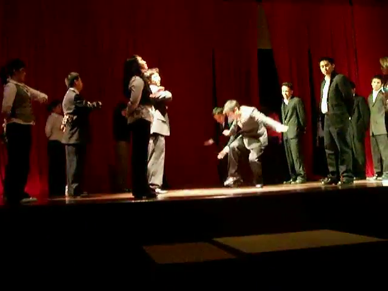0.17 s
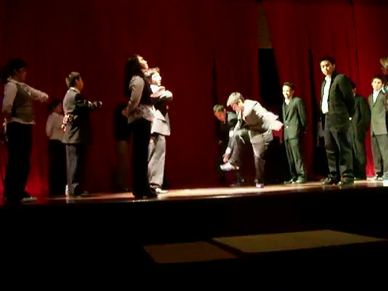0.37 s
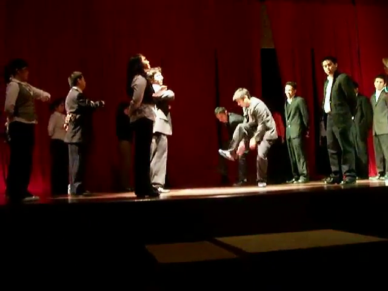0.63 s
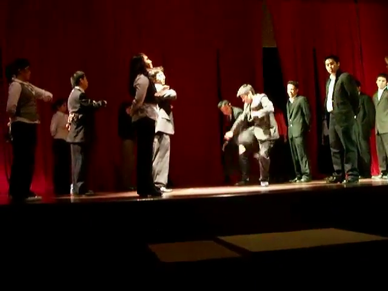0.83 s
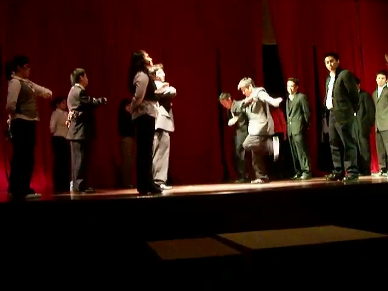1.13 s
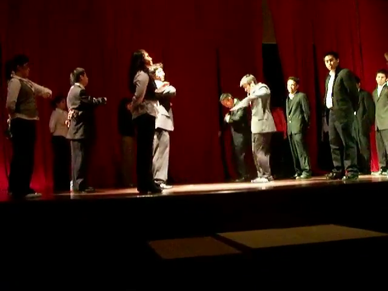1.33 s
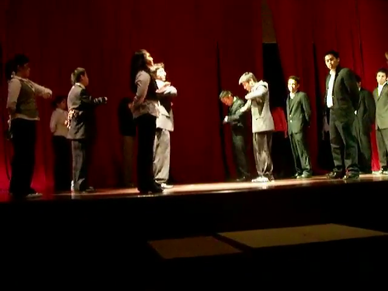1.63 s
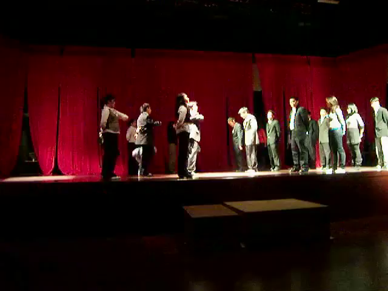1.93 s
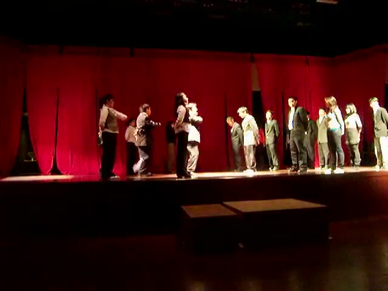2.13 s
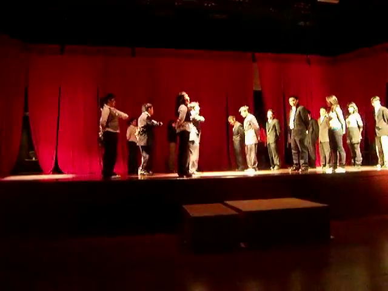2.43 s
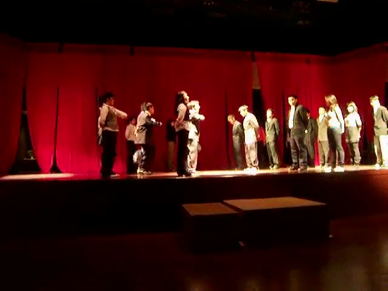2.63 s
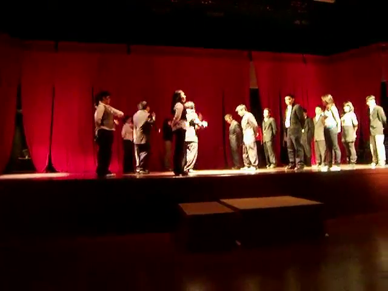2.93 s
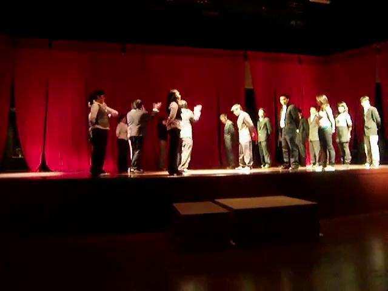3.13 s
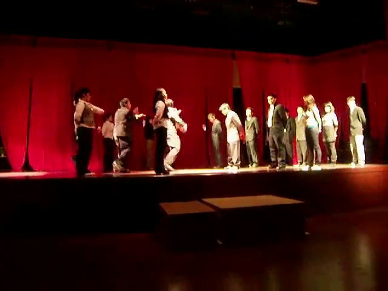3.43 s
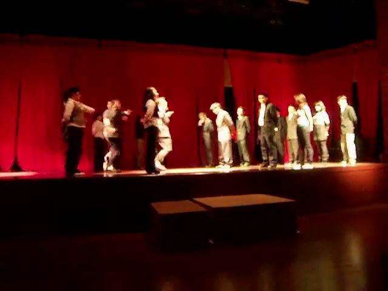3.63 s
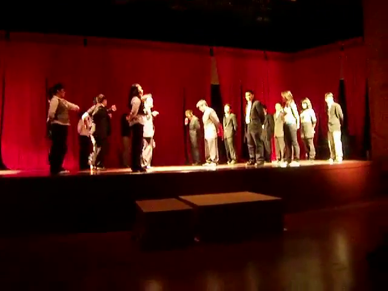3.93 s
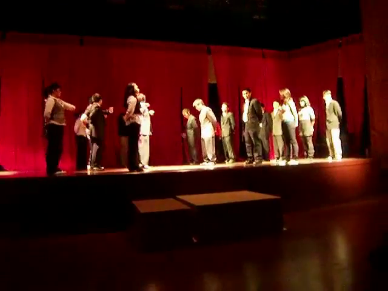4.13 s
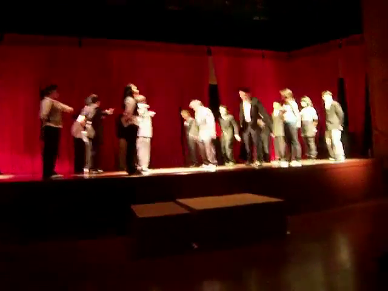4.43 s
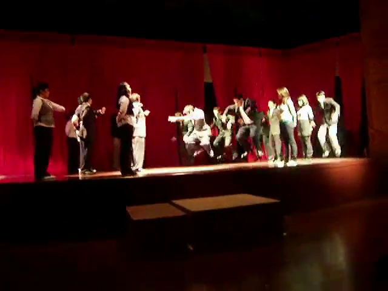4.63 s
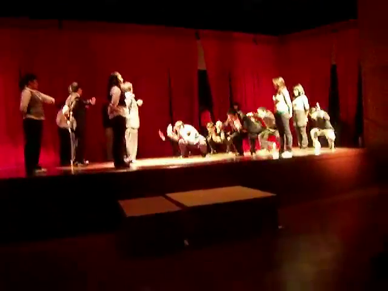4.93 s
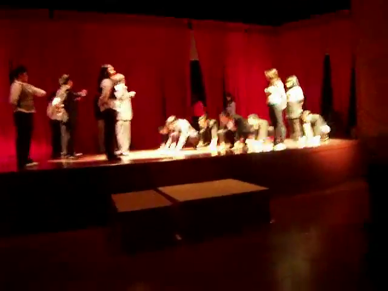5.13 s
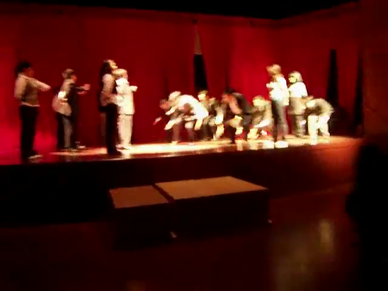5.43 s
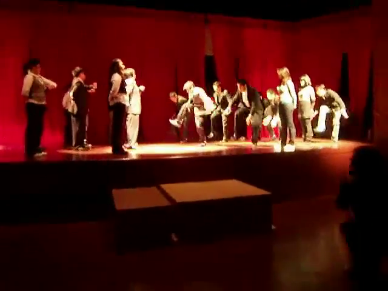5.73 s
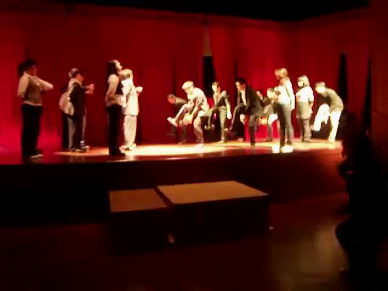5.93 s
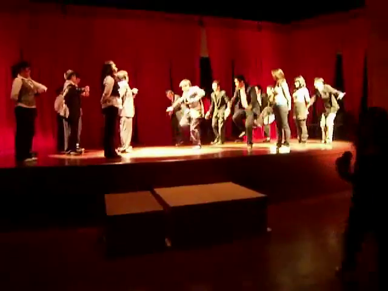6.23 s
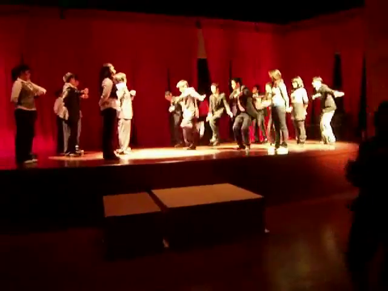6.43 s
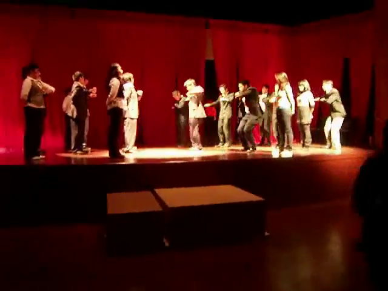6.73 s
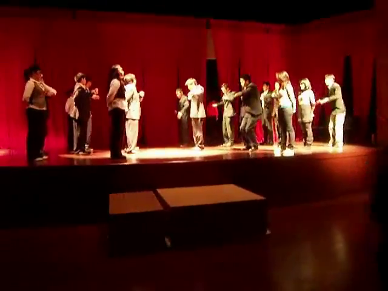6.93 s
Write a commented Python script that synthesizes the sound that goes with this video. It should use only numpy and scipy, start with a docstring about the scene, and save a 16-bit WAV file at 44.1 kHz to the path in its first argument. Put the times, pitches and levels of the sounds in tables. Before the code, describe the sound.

Dancers stomp and clap on a hollow wooden stage, heard from the stalls of a theatre through a small camera microphone. Faint ventilation runs throughout. Light stomps open at 0.1 s, a barely audible shoe scuff follows near 0.4, then one sharp bright clap at 0.6. Single firm stomps land at 1.05 and 1.4, with low stage booms. A loose cluster comes at 2.1, stronger ones at 2.45 and 2.8. After a gap, a loud double clap cracks at 3.25-3.3 and echoes. Ragged group stomps fall at 3.75 and 4.1. A heavy, slamming stomp hits at 4.8, then a quick flurry of bright slaps at 5.12-5.25, and a stomp at 5.5. Three rapid claps run from 5.9 to 6.1. Strong stomps close at 6.4, 6.5 and 6.75, each with short reflections and a brief hall tail.

```python
"""Step group on a wooden stage

A step group stomps, claps and slaps on a hollow stage, heard by a small camera in the stalls.
Every stomp or clap is a short crack of filtered noise; landing feet also ring stage modes into a boom.
Two faint scuffs are grainy band-passed noise. Each sound gets a few echoes and a tail from the hall,
made of shaped noise, over its quiet air: filtered noise and a thin flickering tone."""
import sys
import numpy as np
from scipy import signal
from scipy.fft import rfft, irfft
from scipy.io import wavfile
from scipy.ndimage import uniform_filter1d

SR = 44100
rng = np.random.default_rng(int(sys.argv[2]) if len(sys.argv) > 2 else 0)


def file_out(sig):
    """Save sig as 16-bit WAV at sys.argv[1]."""
    # one column per channel
    cols = np.atleast_2d(sig).T
    # limit, then scale
    lim = np.clip(cols, -1, 1)
    pcm = np.round(lim * 32767).astype(np.int16)
    wavfile.write(sys.argv[1], SR, pcm)


def gain_from_decibels(decibels):
    """Convert decibel values to linear amplitude factors."""
    exponent = np.asarray(decibels, float) / 20
    return 10 ** exponent


N = 312228  # length in samples
LEAD_S, RING_S = .3, 1.4  # lead-in before time 0, length of a hall response (s)

# Ventilation spectrum. Each row: frequency in Hz, relative level in dB per Hz.
AIR_SPECTRUM = [(15, -33), (25, -18.5), (72, -6), (130, -17.5), (147, -36), (184, -19), (286, -24),
                (375, -30.5), (7760, -46.5), (9000, -66.5), (11700, -100), (19800, -120)]
AIR_DB = -53  # rms of the ventilation noise
# Thin tone in the air: frequency in Hz, rms in dB about which it flickers.
WHINE_TONE = (10000, -73.5)
# Body weight coming down. Each row: start in seconds, level in dB, favoured stage frequency in Hz.
WEIGHT_LANDINGS = [(-.12, -30, 41.7), (.102, -29, 39.7), (0.157, -24.5, 62.2), (0.252, -35, 28),
                   (1.059, -20, 43.8), (1.153, -22, 39.3), (1.404, -22, 43), (1.537, -31, 30),
                   (2.059, -25.5, 49.3), (2.115, -23, 46.2), (2.166, -18.5, 44.5), (2.444, -19, 41.6),
                   (2.48, -16, 42.9), (2.602, -24.5, 31.8), (2.751, -17, 36.1), (2.807, -13.5, 38),
                   (2.86, -22, 46.4), (3.739, -29.5, 64), (3.755, -23.5, 69), (3.86, -25, 43),
                   (4.078, -20, 45.3), (4.109, -20, 50.7), (4.803, -12.5, 45.4), (4.843, -22.5, 30),
                   (4.93, -19.5, 60), (5.13, -25.5, 90.4), (5.24, -22.5, 44.8), (5.492, -25, 46.9),
                   (5.55, -20, 50), (6.394, -21.5, 43.2), (6.42, -18.5, 38.7), (6.48, -16, 38),
                   (6.63, -23, 28), (6.72, -22, 31.6), (6.75, -18, 60), (6.85, -20.5, 39)]
# Stage and the air under it. Each row: nominal frequency in Hz, 60 dB decay time in seconds,
# typical level in dB.
STAGE_MODES = [(28, 0.37, 5.5), (38, 0.35, -4), (50.4, 0.32, -4.5), (59.7, 0.26, -5), (78.8, 0.26, -3.5),
               (88.8, 0.16, -6), (102.8, 0.33, -7.5), (144.4, 0.14, -6), (170.8, 0.2, -10.5),
               (206.5, 0.16, -10.5), (259.3, 0.16, -13), (318.5, 0.089, -12)]
# A stiffer landing sounds higher and reaches the modes above 100 Hz more strongly.
UPPER_DB, UPPER_DB_PER_OCT, STAGE_HZ = 2.5, 7, 43
# Soles on the boards. Each row: start in seconds, level in dB, centre in Hz,
# plank knock in dB, hall share in dB over the direct crack.
SOLE_STOMPS = [(-0.11, -15, 3220, -2, 0), (0.1016, -14, 2550, 4.5, 0.5), (0.157, -13.5, 2480, 15, 0),
               (0.515, -37.5, 1820, 41, -2), (1.059, -9.5, 1980, 7, 2), (1.1539, -19.5, 1670, 10.5, 1.5),
               (1.4051, -7.5, 1736, 6, 0.5), (1.5383, -25.5, 1785, 34, 1.5),
               (1.818, -43, 1577, -3.5, -22.5), (2.062, -19.5, 2600, -1, 7.5),
               (2.0862, -18, 2610, 4.5, 0.7), (2.114, -21, 2610, 10.5, 6.5), (2.158, -13.5, 1910, 4, 2.5),
               (2.1801, -18, 2940, 18.5, 6.5), (2.2068, -21, 1905, 24.5, -6.5),
               (2.4441, -6.5, 1815, 0, 0.9), (2.455, -9, 2150, -1, 4.5), (2.4775, -10.5, 1840, 8, 2.5),
               (2.502, -9, 1310, 2.5, -4), (2.7499, -10, 1960, 5, -5), (2.7711, -10.5, 3010, 4.5, -3.5),
               (2.807, -13, 1900, 9, 7.5), (2.832, -9.5, 1480, -1.5, 4), (2.8697, -13, 2350, 2.5, -1.5),
               (3.7374, -20.5, 2110, -8, 7.5), (3.7487, -20.5, 3410, 7, 12.5),
               (3.755, -12.5, 1800, 8.5, -6), (3.7665, -11.5, 1710, -7, 3.5), (4.0721, -23, 1200, 25.5, 7),
               (4.0782, -11, 1980, 7.5, 7.5), (4.1089, -9.5, 1280, 6.5, -1), (4.803, -7, 1720, 2, 3.7),
               (4.818, -5, 2800, -1.2, -11), (4.8423, -1, 1436, -6, -1.3), (4.8661, -11, 2040, 10, 0.5),
               (4.8922, -10, 1200, -3.5, 4.5), (5.4888, -18, 1306, -4.5, 6), (5.5086, -9.5, 2644, 9, -0.4),
               (5.5215, -20.5, 2570, 8.5, 2.5), (6.3944, -5, 2020, -3.5, -1), (6.4192, -15, 1270, 5.5, 3.5),
               (6.477, -3, 1410, -16.5, -3), (6.496, -10.5, 1380, 10, 5.5), (6.7189, -14.5, 2040, 3, -0.5),
               (6.749, -5.5, 1400, 2, -3), (6.76, -3.5, 2202, -8.3, -5.5), (6.7789, -7, 1390, 14.5, -0.5)]
SOLE_EDGE_DB, SOLE_RING_DB, SOLE_WIDTH_OCT = -5, 3, 2.93
# Knock of the planks. Each row: centre in Hz, width in octaves, typical level in dB.
PLANK_BANDS = [(380, 0.93, 1.5), (708, 0.75, -1.5), (1280, 0.26, -6.5)]
# Early returns. Each row: delay in seconds, level in dB over the tail, smear in seconds.
HALL_ECHOES = [(0.01, -4, 0.00079), (0.016, 3, 0.0031), (0.026, 0.5, 0.0021), (0.038, -9.5, 0.0067),
               (0.094, -12, 0.0056)]
# Hall tail. Each row: octave-band centre in Hz, relative level in dB per Hz,
# 60 dB decay time in seconds, build-up time in seconds.
HALL_BANDS = [(30, -12, 1.1, 0.21), (60, -9, 0.96, .05), (102.8, -11.5, 0.83, 0.032),
              (268.8, -6, 0.53, 0.013), (508.4, -7, 0.75, 0.019), (925, -9, 0.72, 0.0067),
              (2180, -11, 0.69, 0.02), (3670, -12.5, 0.62, 0.0089), (7630, -16.5, 0.56, 0.0072)]
# Soles dragged on the boards. Each row: start in seconds, length in seconds,
# level in dB before the fade, centre in Hz.
SOLE_SCUFFS = [(.392, 0.098, -42.5, 1890), (0.457, 0.11, -58, 1820)]
# Hand claps and slaps; the low, dull rows just after 3.2533 are early echoes of that clap.
# Each row: start in seconds, level in dB, centre in Hz, low knock in dB, bright edge in dB,
# hall share in dB over the direct crack.
HAND_CLAPS = [(0.6293, 0.2, 3230, -26, 11, -2.5), (3.2533, 3, 1126, -15.5, 7.5, 3),
              (3.27, -15, 884, 1, -3, 4), (3.2837, -11.5, 823, -0.5, 2, -0.5),
              (3.2965, -1.5, 990, -1, 0, -13), (3.3051, 3.2, 3760, -23, 9, -2.5),
              (5.1241, -13.5, 3620, 10.5, 6.5, 4), (5.1353, -1.5, 3000, -9.5, 20.5, -4.3),
              (5.1414, -8, 2650, -27, 6.2, 6.5), (5.1539, -16, 2760, -11, 15, 2),
              (5.181, -0.5, 3600, -3.5, 21, -3), (5.241, -5.5, 2190, 1.5, 11, 5.5),
              (5.8936, -0.1, 2280, -24.5, 7.5, -1), (5.989, -0.5, 2170, -21, 11, 3),
              (6.0826, -5, 2100, 1, 19.5, 4)]
# A clean clap with little knock rings in a narrower band.
HAND_RING_DB, WIDEST_OCT, NARROWEST_OCT, CLEAN_DB, DB_PER_OCT = -1, 2.24, 1.2, -15.5, 18.5
# Treble droop ahead of the converter. Each row: frequency in Hz, gain in dB.
CAPSULE_DROOP = [(4000, 0), (6500, -3.5), (9000, -9)]
# Microphone response with its lost top. Each row: frequency in Hz, gain in dB.
MIC_RESPONSE = [(15, -19), (25, 1.5), (5000, 3.5), (7000, 1), (8200, -7.5), (9300, -14), (10200, -39.5),
                (11000, -78.5)]
# Filter on the mirror image above the band. Each row: frequency in Hz, gain in dB.
MIRROR_GAIN = [(10000, -71.5), (11500, -15), (13000, -15), (16000, -53), (17000, -67.5)]


def colour(x, points):
    """Causal filter through (Hz, dB) points, from the cepstrum of the log gain."""
    size = 8192
    hz, db = np.transpose(points)
    f = np.maximum(np.arange(size // 2 + 1) * SR / size, 1)
    log_gain = np.interp(np.log(f), np.log(hz), db) * np.log(10) / 20
    cepstrum = irfft(log_gain)
    # folding the second half onto the first gives minimum phase
    cepstrum[1:size // 2] *= 2
    cepstrum[size // 2 + 1:] = 0
    impulse = irfft(np.exp(rfft(cepstrum)))
    return signal.fftconvolve(x, impulse)[:len(x)]


def band(x, hz, width_oct, order=2):
    """Band-pass of a given width in octaves."""
    edges = hz * 2. ** (np.array([-.5, .5]) * width_oct)
    edges = np.clip(edges, 10, [.4 * SR, .45 * SR])
    return signal.sosfilt(signal.butter(order, edges, "band", fs=SR, output="sos"), x)


def air():
    """Ventilation rumble and hiss, with a thin whine that flickers."""
    noise = colour(rng.standard_normal(N), AIR_SPECTRUM)
    whine_hz, whine_db = WHINE_TONE
    steps = np.repeat(rng.standard_normal(N // 1024 + 1), 1024)[:N]
    flicker_db = 3.0 * uniform_filter1d(steps, size=1024)
    sine = np.sqrt(2) * np.sin(2 * np.pi * whine_hz * np.arange(N) / SR)
    return gain_from_decibels(AIR_DB) * noise / np.std(noise) + gain_from_decibels(whine_db + flicker_db) * sine


def under(hz, near_hz, boost_db=5.0, width_oct=0.36):
    """Extra dB for modes close to the one that bends under the foot."""
    return boost_db * np.exp(-(np.log2(hz / near_hz) / width_oct) ** 2)


def boom(near_hz):
    """A body's soft push rings the stage modes in other shares each time; stiff legs reach the upper ones."""
    t = np.arange(int(.6 * SR)) / SR
    upper_db = UPPER_DB + UPPER_DB_PER_OCT * np.log2(near_hz / STAGE_HZ)
    rise = 1 - np.exp(-t / 0.011)
    total = np.zeros(len(t))
    for hz, t60, db in STAGE_MODES:
        share, detune, phase = rng.standard_normal(3)
        mode_db = db + 1.8 * share + under(hz, near_hz) + upper_db * (hz > 100)
        tone = np.sin(2 * np.pi * hz * (1 + .05 * detune) * t + 2 * phase)
        total += gain_from_decibels(mode_db) * rise * 1000 ** (-t / t60) * tone
    return total


def crack(hz, width, low_db, edge_db, ring_db):
    """Air squeezed out in a few ms: ringing centre, bright edge, lower knock.

    Returns the ragged burst one ear gets and the smoother mean over all directions that fills the hall."""
    t = np.arange(int(.04 * SR)) / SR
    fade = np.exp(-t / 0.0013) + 0.39 * np.exp(-t / 0.0057)
    noise = rng.standard_normal(len(t)) * np.minimum(t / 0.00046, 1) * fade
    pulse = 1.32 * np.exp(-((t - .0003) / .00006) ** 2)
    planks = gain_from_decibels(2.5 * rng.standard_normal(len(PLANK_BANDS)))  # uneven from blow to blow

    def tone(v):
        """Shapes the spectrum and sets a fixed energy."""
        knock = sum(g * gain_from_decibels(db) * band(v, f, w, order=1) for (f, w, db), g in zip(PLANK_BANDS, planks))
        body = band(v, hz, width, order=1) + gain_from_decibels(ring_db) * band(v, hz, .5, order=1)
        edge = band(v, 9100, 1.29, order=1)
        shaped = body + gain_from_decibels(edge_db) * edge + gain_from_decibels(low_db) * knock
        return 3.87 * shaped / np.linalg.norm(shaped)
    ragged = tone(noise - pulse)
    smooth = tone(t == 0) + 0.066 * ragged
    return ragged, smooth


def stomp(hz, knock_db):
    """A sole slaps the boards: a wide crack over the knock of the planks."""
    return crack(hz, SOLE_WIDTH_OCT, knock_db, SOLE_EDGE_DB, SOLE_RING_DB)


def hall():
    """Returns a maker of responses: the same walls, another spot on the stage every time."""
    t = np.arange(int(RING_S * SR)) / SR
    scatter, shapes = [], []
    # folded curtains and rough walls smear each echo into a short cluster
    early = sum(gain_from_decibels(db) * (t > delay) * np.exp(-np.maximum(t - delay, 0) / smear)
                for delay, db, smear in HALL_ECHOES)
    for hz, db, t60, build in HALL_BANDS:
        noise = band(rng.standard_normal(2 * len(t)), hz, 1.0)
        scatter.append(noise / np.std(noise))
        # the tail waits for the nearest wall
        swell = (1 - np.exp(-np.maximum(t - .004, 0) / build)) * 1000 ** (-t / t60)
        # equal energy per Hz for equal dB
        shapes.append(gain_from_decibels(db) * np.sqrt(hz / SR / 100) * (swell + early * (hz > 400)))
    scatter, shapes = np.array(scatter), np.array(shapes)

    def response():
        """Takes a random stretch of the scatter under the same envelopes."""
        start = rng.integers(len(t))
        return np.sum(scatter[:, start:start + len(t)] * shapes, axis=0)
    return response


def scuff(length, db, hz):
    """Rubber slipping on wood: grainy noise in a squeaky band and a wide hiss, fading as the foot stops."""
    n = int(length * SR)
    grain_db = 3. * np.repeat(rng.standard_normal(n // 128 + 1), 128)[:n]
    grit = rng.standard_normal(n) * gain_from_decibels(grain_db)
    rub = band(grit, hz, 0.15, order=1) + gain_from_decibels(-13.5) * band(grit, 4000, 7.0, order=1)
    u = np.arange(n) / n
    return gain_from_decibels(db) * rub / np.std(rub) * np.minimum(u / .25, 1) * (1 - u)


def clap(hz, knock_db, edge_db):
    """Hands squeeze out the air between them: a crack whose band narrows as the knock gets weaker."""
    width = np.clip(WIDEST_OCT + (knock_db - CLEAN_DB) / DB_PER_OCT, NARROWEST_OCT, WIDEST_OCT)
    return crack(hz, width, knock_db, edge_db, HAND_RING_DB)


def add(out, s, sound):
    """Mixes a sound in at time s."""
    i = int((s + LEAD_S) * SR)
    out[i:i + len(sound)] += sound[:len(out) - i]


def blow(out, s, direct, spread, response):
    """Direct sound plus what the hall returns."""
    add(out, s, direct)
    add(out, s, signal.fftconvolve(spread, response()))


def scene():
    """All landings, stomps, scuffs and claps in the hall, over its air."""
    out = np.zeros(N + int(LEAD_S * SR))
    response = hall()
    for s, db, hz in WEIGHT_LANDINGS:
        weight = gain_from_decibels(db) * boom(hz)
        blow(out, s, weight, weight, response)
    for s, db, hz, knock_db, tail_db in SOLE_STOMPS:
        ragged, smooth = stomp(hz, knock_db)
        blow(out, s, gain_from_decibels(db) * ragged, gain_from_decibels(db + tail_db) * smooth, response)
    for s, length, db, hz in SOLE_SCUFFS:
        rub = scuff(length, db, hz)
        blow(out, s, rub, gain_from_decibels(-3.5) * rub, response)
    for s, db, hz, knock_db, edge_db, tail_db in HAND_CLAPS:
        ragged, smooth = clap(hz, knock_db, edge_db)
        blow(out, s, gain_from_decibels(db) * ragged, gain_from_decibels(db + tail_db) * smooth, response)
    return (out[-N:] + air())[None]


def band_limit(x):
    """A steep low-pass at the top of the band."""
    return signal.sosfilt(signal.butter(12, 16300, fs=SR, output="sos"), x)


def record(dry):
    """The camera rounds the peaks, stores coarse logarithmic samples whose grain rides on the waveform,
    loses the top and leaves a faint mirror of the treble above it."""
    ceiling, mu, steps = .84, 255, 56  # peak limit, log curvature, levels per polarity
    x = ceiling * np.tanh(colour(dry[0], CAPSULE_DROOP) / ceiling)
    log_size = np.log1p(mu * np.abs(x)) / np.log1p(mu)
    coarse = np.round(steps * log_size) / steps
    x = np.sign(x) * np.expm1(coarse * np.log1p(mu)) / mu
    x = colour(x, MIC_RESPONSE)
    # flipping every other sample mirrors the spectrum
    mirror = x * (-1.) ** np.arange(N)
    x = x + colour(mirror, MIRROR_GAIN)
    return band_limit(x[None])


dry = scene()
out = record(dry)
file_out(out)
```